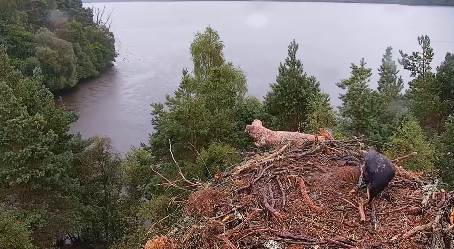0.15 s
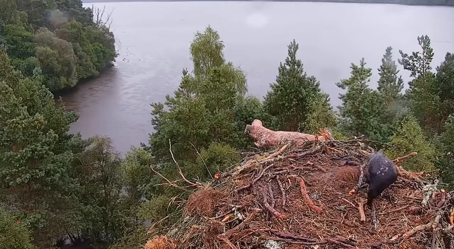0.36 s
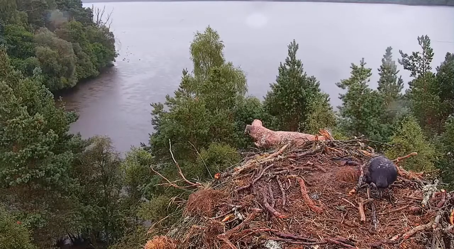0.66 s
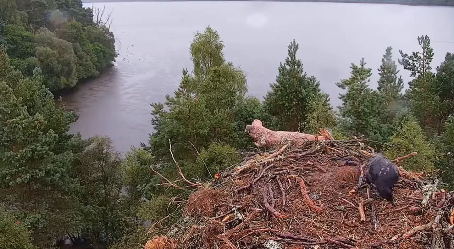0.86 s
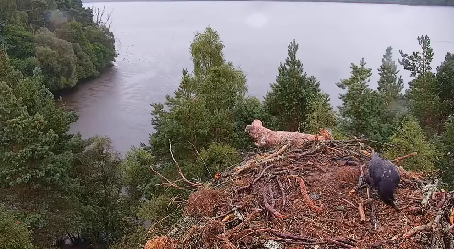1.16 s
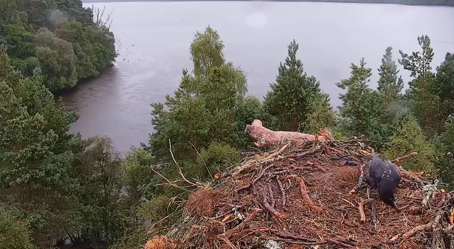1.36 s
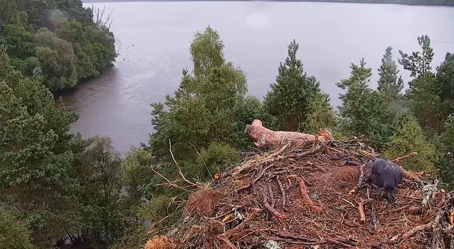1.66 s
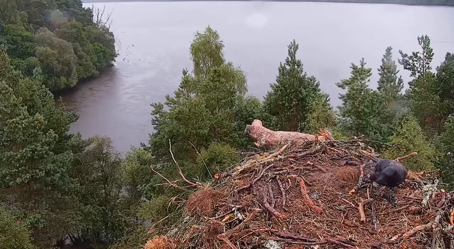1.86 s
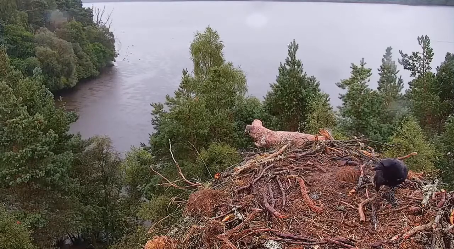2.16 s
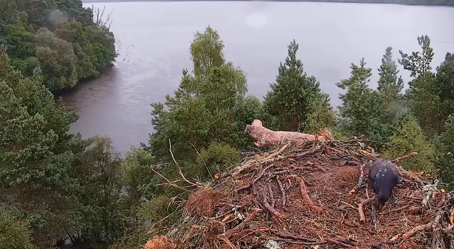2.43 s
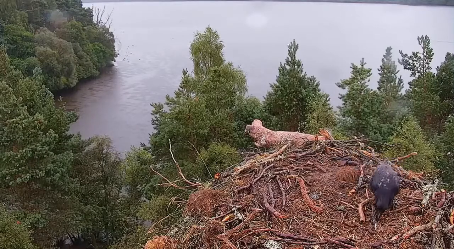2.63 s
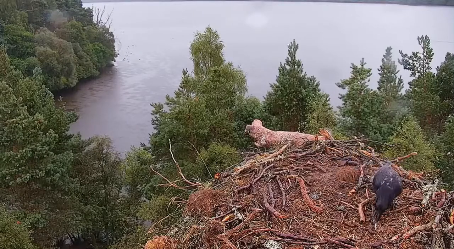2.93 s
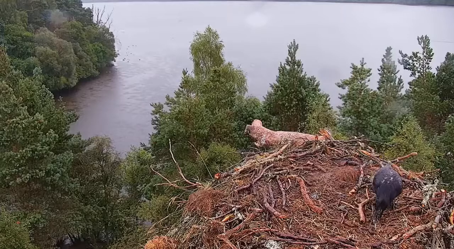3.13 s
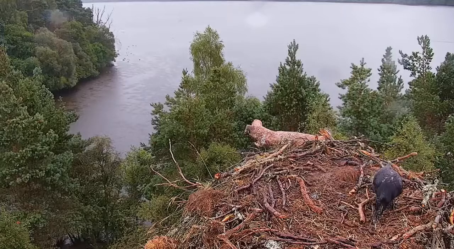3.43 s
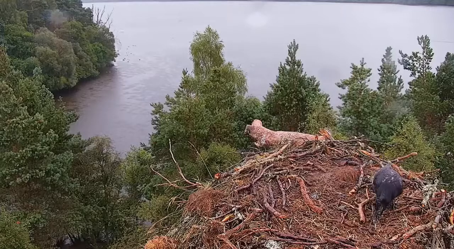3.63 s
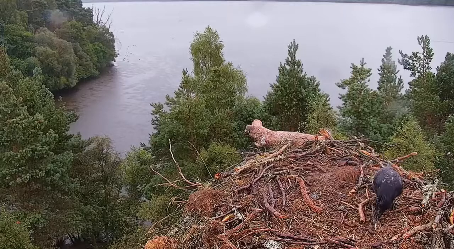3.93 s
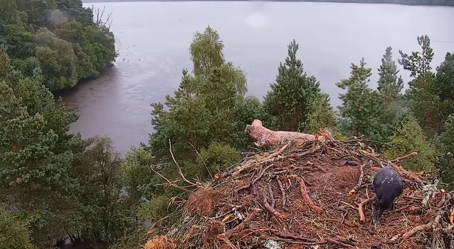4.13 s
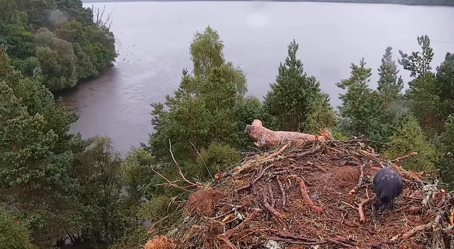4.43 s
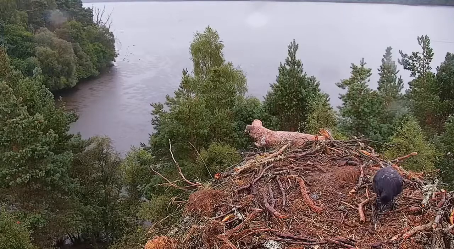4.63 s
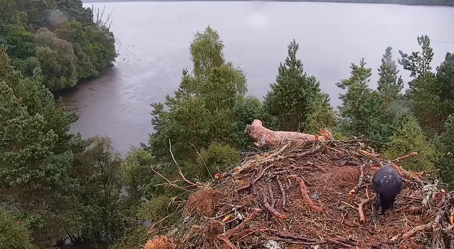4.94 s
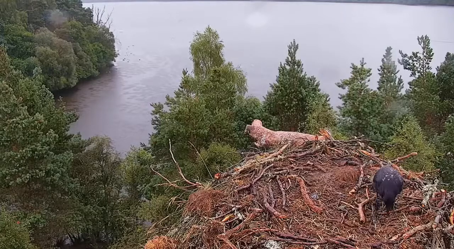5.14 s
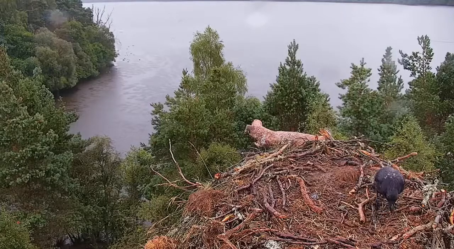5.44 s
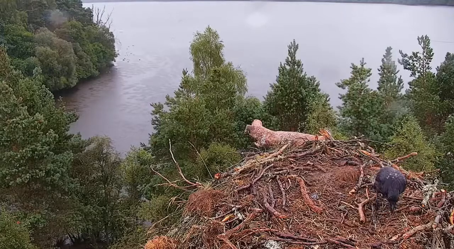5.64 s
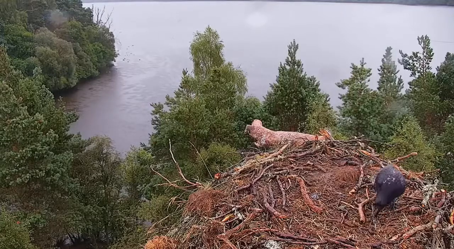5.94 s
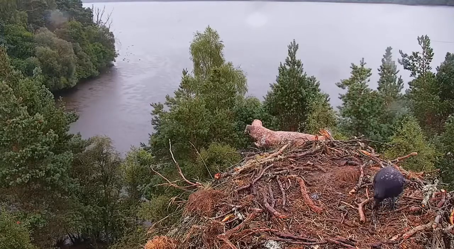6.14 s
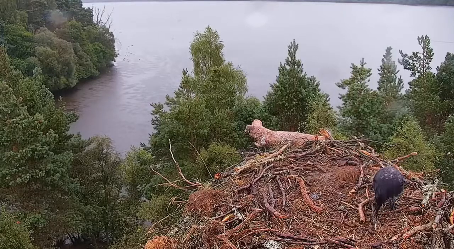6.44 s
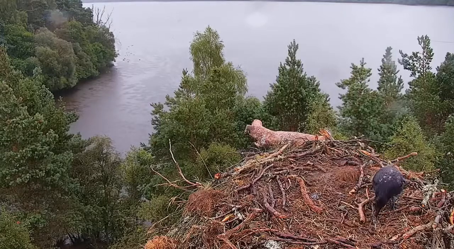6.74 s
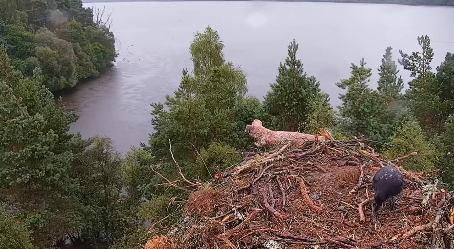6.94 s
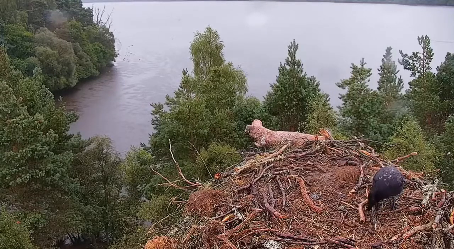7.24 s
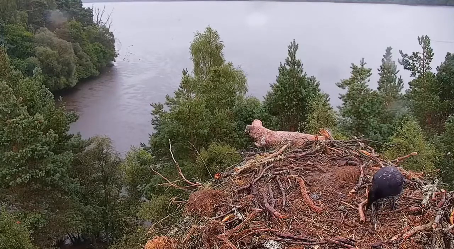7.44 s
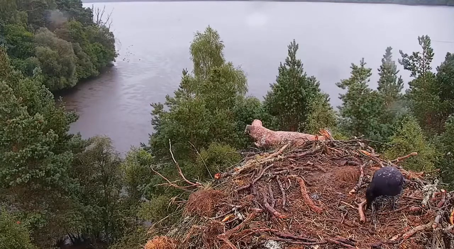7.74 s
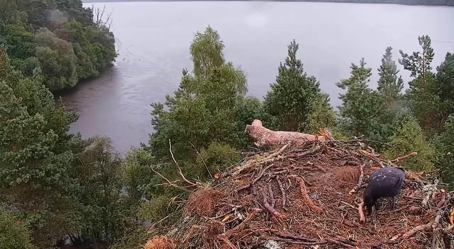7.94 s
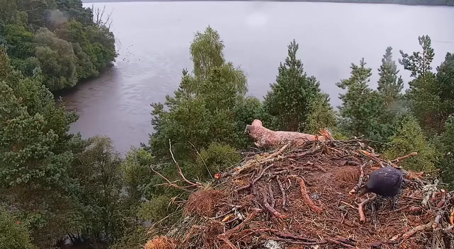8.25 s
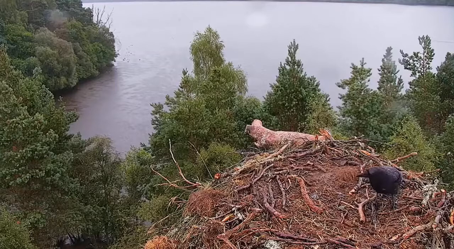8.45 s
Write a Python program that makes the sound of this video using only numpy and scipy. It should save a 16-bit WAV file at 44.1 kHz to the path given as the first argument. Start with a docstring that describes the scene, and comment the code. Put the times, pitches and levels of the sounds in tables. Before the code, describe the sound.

Rain falls on a weatherproof casing high in the trees above a lake. Low, hollow, very short thuds come irregularly, several per second, some soft and some strong, each dropping in pitch. Bright crackling splashes snap right beside the microphone. Behind lie a steady quiet hiss of rain on leaves, tiny ticks on twigs, a faint low breeze rumble and a barely audible high electronic whine. The large bird in the nest is not heard.

```python
"""Raindrops land on a weatherproof outdoor camera in a treetop nest above a lake: short thuds that fall in pitch.
Each thud is a contact force through the resonances of housing and mount, with dispersed bending waves.
Splashes beside the microphone add a knock of the hood and a sharp run of droplet ticks.
Behind them: filtered clicks and noise for rain in the trees, ticks on twigs, breeze rumble,
and sines for the faint whine of the electronics."""
import sys
import numpy as np
from scipy import signal
from scipy.fft import rfft, irfft
from scipy.io import wavfile

SR = 44100
rng = np.random.default_rng(int(sys.argv[2]) if len(sys.argv) > 2 else 0)


def transcribe(u):
    """Save the signal u as a 16-bit wav file named by the first command-line argument.

    u: samples, shape (n,) or (channels, n), limited to [-1, 1]; the rate is SR.
    q: integer samples, one column per channel.
    """
    v = np.clip(np.atleast_2d(u).T, -1, 1)
    q = np.round(v * 32767).astype(np.int16)
    wavfile.write(sys.argv[1], SR, q)


N = 378378  # samples

# Heavy drops on the housing:
# (time [s], peak level [dB], contact sharpness [Hz], mount sway under that spot [Hz])
HEAVY_DROPS = [(0.0014, -14.5, 560, 123), (0.1625, -10.5, 260, 147), (0.217, -16.5, 130, 140),
               (0.4453, -23.5, 348, 170), (0.7245, -17.5, 310, 123), (0.7888, -15, 800, 114),
               (0.8849, -14, 600, 170), (1.1468, -18.6, 290, 201), (1.489, -5.5, 370, 157),
               (1.8403, -22, 640, 125), (1.893, -16.5, 160, 209), (1.999, -16.5, 402, 114),
               (2.029, -11, 130, 148), (2.4086, -13.5, 610, 170), (2.4834, -16, 480, 135),
               (2.7855, -8.5, 370, 153), (2.9628, -17, 290, 174), (3.95, -3.5, 300, 159),
               (4.0377, -14, 500, 154), (4.185, -19.5, 640, 133), (4.406, -9.5, 169, 163),
               (4.4833, -7.5, 278, 194), (4.7318, -20.5, 2000, 125), (4.776, -10, 425, 164),
               (4.8115, -18, 1410, 149), (5.11, -24.5, 400, 160), (5.2887, -24.5, 900, 160),
               (5.482, -12.5, 190, 137), (5.6282, -18, 580, 143), (6.0214, -19, 645, 115),
               (6.0403, -11.5, 200, 202), (6.2, -20.5, 260, 204), (6.381, -11.5, 580, 135),
               (6.411, -19.5, 120, 149), (6.4821, -10, 520, 129), (6.7676, -18.2, 524, 125),
               (6.976, -8.5, 130, 161), (7.0862, -19, 480, 114), (7.2662, -9, 980, 145),
               (7.293, -10.5, 515, 125), (7.421, -7.5, 560, 156), (7.512, -24, 450, 150),
               (7.736, -15.5, 403, 195), (7.7788, -16, 170, 115), (8.065, -13.5, 676, 129),
               (8.1185, -19, 334, 150), (8.253, -18.5, 280, 136)]
# Drops bursting beside the microphone, levels ahead of the hood:
# (time [s], knock peak level [dB], spray peak level [dB], spray centre [Hz])
MIC_SPLASHES = [(0.1626, -15, -9, 6000), (0.4272, -42, -21, 13000), (0.79, -14, -23, 8300),
                (1.9973, -17, -4, 13700), (2.483, -21.5, -30, 8900), (2.7856, -16.5, -18.5, 6000),
                (3.1556, -42, -18, 9000), (3.343, -42, -19, 13500), (4.121, -42, -18, 11800),
                (4.305, -42, -19.5, 6500), (4.406, -23, -31, 7200), (6.2549, -22, -21, 6200),
                (6.382, -23, -31, 7700), (6.4129, -20.5, -18, 5560), (6.505, -42, -18, 10400),
                (7.0865, -18.5, -18.5, 5740), (7.2666, -14, -13, 5200), (7.2932, -17.5, -18, 11500),
                (7.4227, -19.5, -26, 6400), (8.4005, -25, -15.5, 12500)]
# Spectrum shape of rain in the trees: (frequency [Hz], relative density [dB per Hz])
FOLIAGE_SPECTRUM = [(50, -5), (300, 0), (650, -4), (850, -0.5), (1000, -1.5), (1600, 1.5), (2150, 1.5),
                    (2500, -3), (3100, 2.5), (4000, -3.5), (8500, -11.5), (12500, -17.5), (14200, -19),
                    (15500, -12), (16000, -42)]
# Spectrum shape of the air rumble around the camera: (frequency [Hz], relative density [dB per Hz])
RUMBLE_SPECTRUM = [(25, -45), (50, -32), (68, -8), (90, -3.5), (125, 4), (170, -7), (400, -40.5)]
# Whine of the electronics: (frequency [Hz], rms level [dB])
WHINE_TONES = [(11727, -66), (11778, -74), (15524, -71), (15574, -73), (15624, -59.5), (15674, -69),
               (15724, -74)]

BLOW_SIZE = 4096  # samples in one impulse sound
BLOW_HZ = np.fft.rfftfreq(BLOW_SIZE, 1 / SR)
CONTACT_HZ = 395  # contact sharpness of a typical drop
RING_HZ, RING_FOLLOWS = 283, 0.14  # housing ring under it; octaves of rise per octave of sharpness
SHELL_HZ = 923  # slight ring of the housing's shell
MOUNT_Q = 2.08  # freedom of the mount's sway
NODE_HZ = 169.8  # the mount hardly moves at the microphone here
BEND_HZ, BEND_Q = 150.2, 0.55  # bending waves lag most around this pitch
BASS_CUT_HZ, BASS_CUT_Q = 118, 1  # low end of the microphone
KNOCK_HZ, KNOCK_Q = 1480, 1  # short ring of the hood under a splash
DROPLET_GAP_S, DROPLET_LOSS_DB = 0.00022, 3.0  # mean gap between droplets; loss from one to the next
HOOD_NOTCH_SPACING_HZ, HOOD_REFLECTION = 3750, 0.27  # reflection as an amplitude ratio
CUTOFF_HZ = 15850


def from_db(db):
    """Amplitude ratio of a level in dB."""
    return 10 ** (np.asarray(db) / 20)


def rms_one(x):
    """Scale to rms 1."""
    return x / np.sqrt(np.mean(x ** 2) + 1e-20)


def peak_one(x):
    """Scale to peak 1."""
    return x / np.abs(x).max()


def add(out, time_s, sound):
    """Mix a sound in at a given time."""
    at = min(max(round(time_s * SR), 0), N - 1)
    out[at:at + len(sound)] += sound[:N - at]


def coloured(x, spectrum):
    """Filter by (Hz, dB) points, interpolated over log frequency; rms 1."""
    hz, level_db = np.transpose(spectrum)
    bins_hz = np.maximum(np.fft.rfftfreq(N, 1 / SR), 1)
    gain_db = np.interp(np.log(bins_hz), np.log(hz), level_db)
    return rms_one(irfft(rfft(x) * from_db(gain_db), N))


def patter(per_s, spread_db):
    """Clicks at random moments, many small and a few large."""
    sizes = from_db(spread_db * np.minimum(rng.exponential(1, N), np.pi))
    return (rng.random(N) < per_s / SR) * sizes


def random_times_s(per_s):
    """Random moments at a mean rate."""
    return np.flatnonzero(rng.random(N) < per_s / SR) / SR


def drift(knots_per_s):
    """Random line through evenly spaced knots; rms 1."""
    knots = rng.standard_normal(int(knots_per_s * N / SR) + 2)
    return rms_one(np.interp(np.arange(N) * knots_per_s / SR, np.arange(len(knots)), knots))


def oscillator(hz, q):
    """Frequency response of a damped mass on a spring."""
    s = 1j * BLOW_HZ / hz
    return 1 / (1 + s / q + s * s)


def thud(contact_hz, ring_hz, sway_hz, node_q=8.3, node_skirt_q=1.96, shell_q=4.4, shell_skirt_q=1.08):
    """One drop on the housing, heard through the mount; peak 1."""
    # a soft, spreading contact carries little treble
    push = oscillator(contact_hz, 0.47) * oscillator(ring_hz, 1.51)
    shell = oscillator(SHELL_HZ, shell_q) / oscillator(SHELL_HZ, shell_skirt_q)
    mount = -BLOW_HZ ** 2 * oscillator(sway_hz, MOUNT_Q)
    node = oscillator(NODE_HZ, node_skirt_q) / oscillator(NODE_HZ, node_q)
    # phase only: bending waves disperse, highs arrive first, so the thud sweeps down
    lag = np.exp(8j * np.angle(oscillator(BEND_HZ, BEND_Q)))
    bass_cut = -BLOW_HZ ** 2 * oscillator(BASS_CUT_HZ, BASS_CUT_Q)
    return peak_one(irfft(push * shell * mount * node * lag * bass_cut))


def drop(contact_hz, sway_hz):
    """Thud whose housing ring rises with the sharpness of the contact."""
    ring_hz = RING_HZ * (contact_hz / CONTACT_HZ) ** RING_FOLLOWS
    return thud(contact_hz, ring_hz, sway_hz)


def big_drops():
    """Heavy drops on the housing, each with its own sharpness and mount sway."""
    out = np.zeros(N)
    for time_s, peak_db, contact_hz, sway_hz in HEAVY_DROPS:
        add(out, time_s, from_db(peak_db) * drop(contact_hz, sway_hz))
    return out


def middling_drops(per_s=2.4, peak_db=-29.0, spread_db=1.5, contact_octaves=0.49, sway_hz=150, sway_octaves=0.22):
    """Lighter drops at random times, each on another spot."""
    out = np.zeros(N)
    for time_s in random_times_s(per_s):
        size, sharpness, spot = rng.standard_normal(3)
        contact_hz = CONTACT_HZ * 2 ** (contact_octaves * sharpness)
        sound = drop(contact_hz, sway_hz * 2 ** (sway_octaves * spot))
        add(out, time_s, from_db(peak_db + spread_db * size) * sound)
    return out


def small_drops(per_s=140, spread_db=1.5, level_db=-41.0, contact_hz=380, sway_hz=150):
    """Fine rain drums softly on housing spots of different ring pitch."""
    rings_hz = np.geomspace(220, 370, num=5)
    out = np.zeros(N)
    for ring_hz in rings_hz:
        clicks = patter(per_s / len(rings_hz), spread_db)
        out += signal.oaconvolve(clicks, thud(contact_hz, ring_hz, sway_hz))[:N]
    return from_db(level_db) * rms_one(out)


def tick(hz, q):
    """Click through a broad resonance, taken twice for steep skirts; peak 1."""
    return peak_one(irfft((1j * BLOW_HZ * oscillator(hz, q)) ** 2))


def spray(hz, q, count=5):
    """Bursting drop: a quick run of ever fainter droplet ticks; peak 1."""
    out, one = np.zeros(BLOW_SIZE), tick(hz, q)
    gaps_s = rng.exponential(DROPLET_GAP_S, count)
    times_s = np.cumsum(gaps_s) - gaps_s[0]
    for k, time_s in enumerate(times_s):
        out += from_db(-DROPLET_LOSS_DB * k) * np.roll(one, round(time_s * SR))
    return peak_one(out)


def splashes(spray_q=1.31):
    """Drops beside the microphone knock on the hood and burst into spray."""
    out = np.zeros(N)
    for time_s, knock_db, spray_db, spray_hz in MIC_SPLASHES:
        add(out, time_s, from_db(knock_db) * tick(KNOCK_HZ, KNOCK_Q))
        add(out, time_s, from_db(spray_db) * spray(spray_hz, spray_q))
    return out


def stray_splashes(per_s=5.2, peak_db=-26.0, spread_db=2.0, spray_hz=11000, spray_octaves=0.4, spray_q=2.1):
    """Drops burst at random times a little farther off: spray without a knock."""
    out = np.zeros(N)
    for time_s in random_times_s(per_s):
        size, pitch = rng.standard_normal(2)
        sound = spray(spray_hz * 2 ** (spray_octaves * pitch), spray_q)
        add(out, time_s, from_db(peak_db + spread_db * size) * sound)
    return out


def hood(x):
    """An inverted reflection inside the microphone's hood cuts evenly spaced notches."""
    n = np.arange(N)
    delay = round(SR / HOOD_NOTCH_SPACING_HZ)  # samples
    return x - HOOD_REFLECTION * np.interp(n - delay, n, x)


def foliage(per_s=3000, spread_db=6.0, near_db=-45.0, far_db=-40.0, flurry_db=2.0):
    """Near needles crackle in small flurries; far trees and lake merge into a smooth hiss."""
    clicks = patter(per_s, spread_db) * rng.choice([-1, 1], N)
    near = coloured(clicks, FOLIAGE_SPECTRUM)
    far = coloured(rng.standard_normal(N), FOLIAGE_SPECTRUM)
    near_gain = from_db(near_db + flurry_db * drift(30))
    return near_gain * near + from_db(far_db) * far


def twig_ticks(per_s=70, spread_db=3.0, level_db=-55.5, q=1.9):
    """Light ticks on the sticks of the nest, each stick with its own pitch."""
    sticks_hz = np.geomspace(6500, 14500, num=6)
    out = np.zeros(N)
    for hz in sticks_hz:
        clicks = patter(per_s / len(sticks_hz), spread_db)
        out += signal.oaconvolve(clicks, tick(hz, q))[:N]
    return from_db(level_db) * rms_one(out)


def rumble(level_db=-40.5, lumpy_db=2.5):
    """A light breeze buffets the camera unevenly: low noise of drifting level."""
    gain = from_db(level_db + lumpy_db * drift(16))
    return gain * coloured(rng.standard_normal(N), RUMBLE_SPECTRUM)


def whine():
    """The camera's line-scan tone and a weaker tone below it, with mains sidebands."""
    t_s = np.arange(N) / SR
    out = np.zeros(N)
    for hz, rms_db in WHINE_TONES:
        out += np.sqrt(2) * from_db(rms_db) * np.sin(2 * np.pi * (hz * t_s + rng.random()))
    return out


def scene():
    """Airborne sound passes the hood; thuds travel through the camera's body."""
    body = big_drops() + middling_drops() + small_drops()
    airborne = hood(splashes() + stray_splashes() + foliage() + twig_ticks())
    return (body + airborne + rumble() + whine())[None]


def record(dry):
    """Steep low-pass: little remains above the cutoff."""
    low_pass = signal.ellip(10, .1, 80, CUTOFF_HZ, fs=SR, output="sos")  # ripple, stopband [dB]
    return signal.sosfilt(low_pass, dry)


dry = scene()
out = record(dry)
transcribe(out)
```